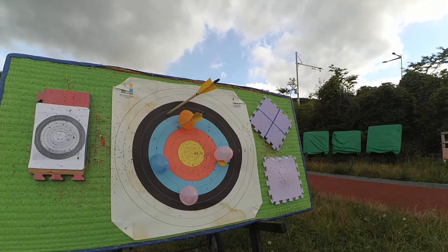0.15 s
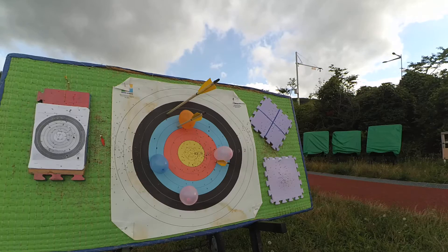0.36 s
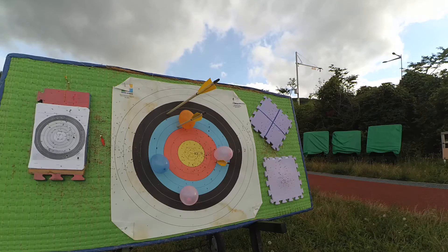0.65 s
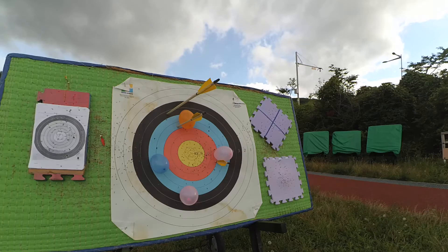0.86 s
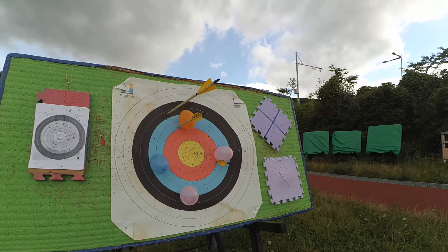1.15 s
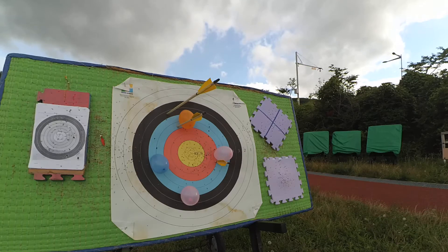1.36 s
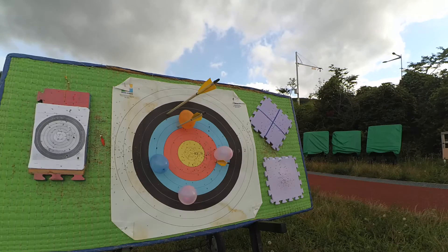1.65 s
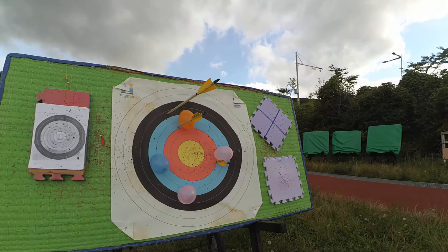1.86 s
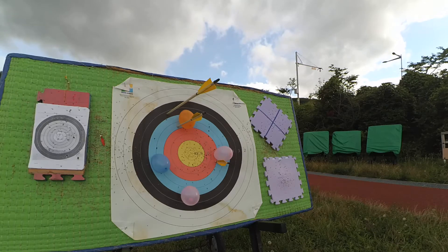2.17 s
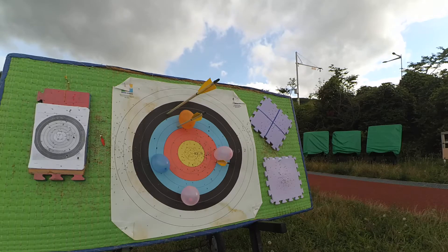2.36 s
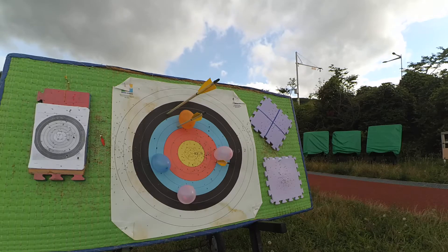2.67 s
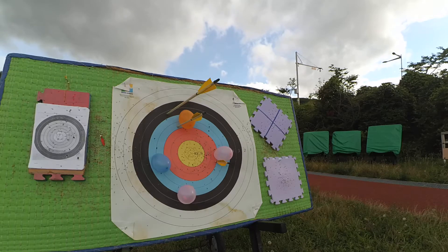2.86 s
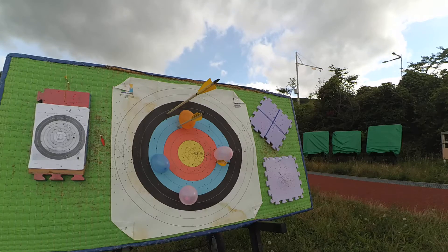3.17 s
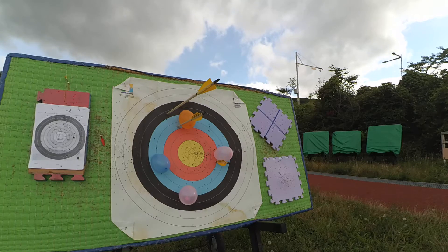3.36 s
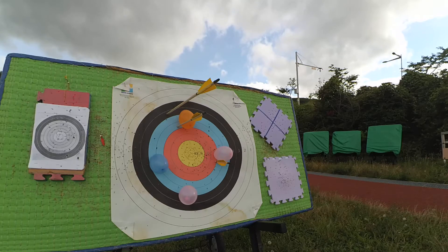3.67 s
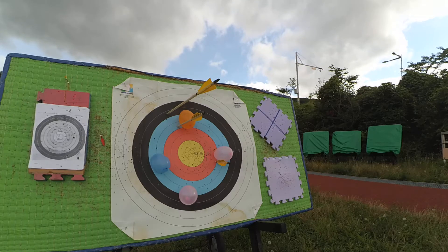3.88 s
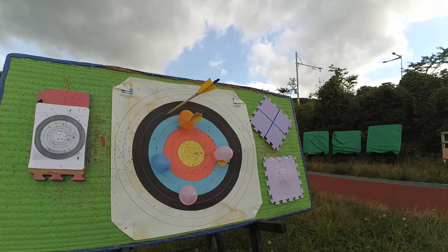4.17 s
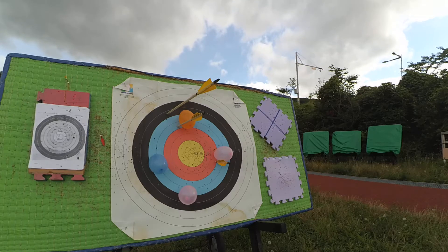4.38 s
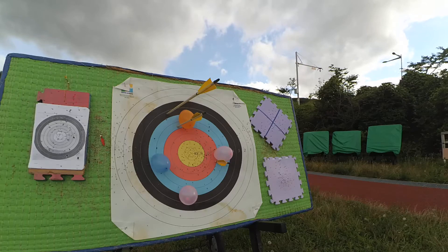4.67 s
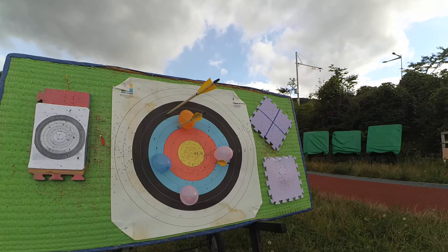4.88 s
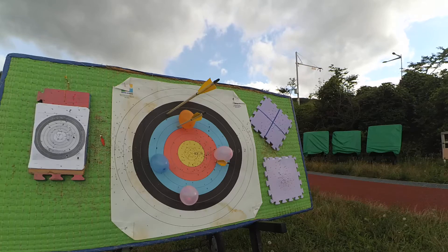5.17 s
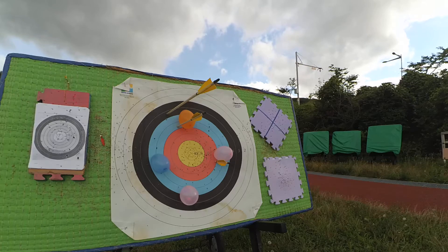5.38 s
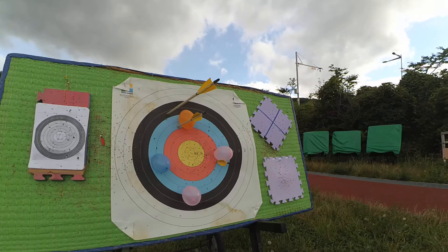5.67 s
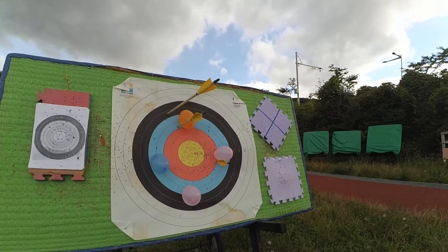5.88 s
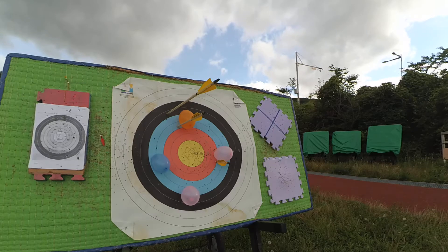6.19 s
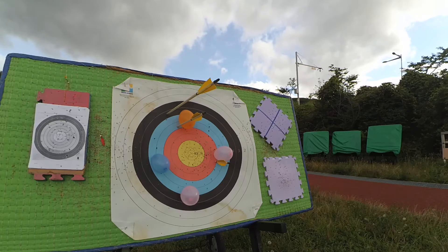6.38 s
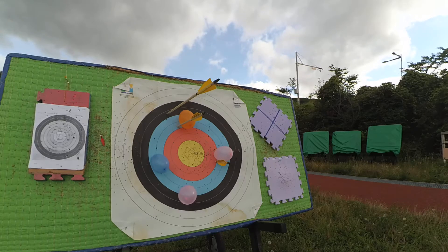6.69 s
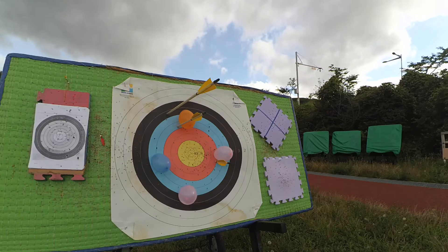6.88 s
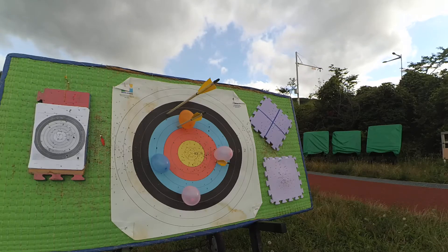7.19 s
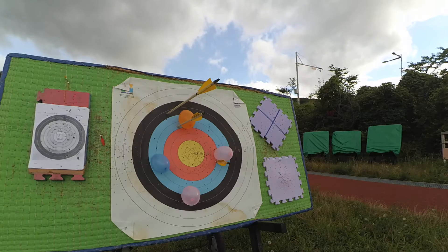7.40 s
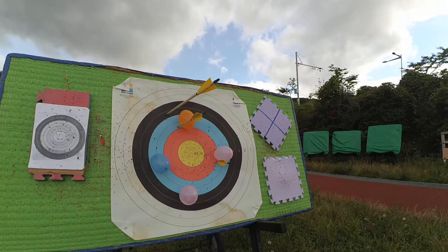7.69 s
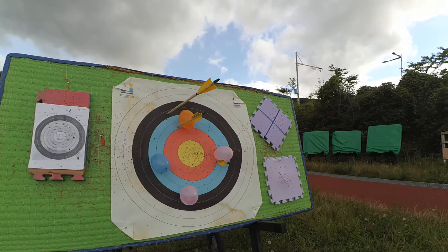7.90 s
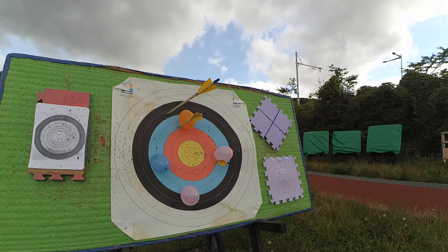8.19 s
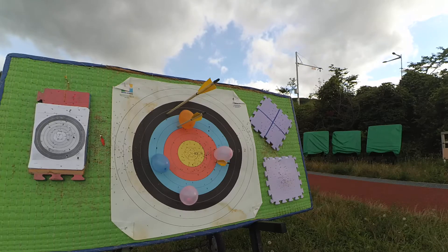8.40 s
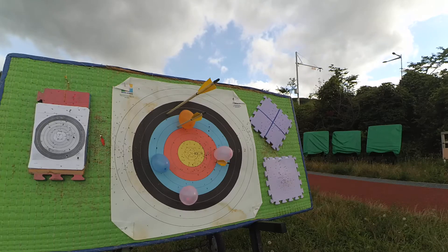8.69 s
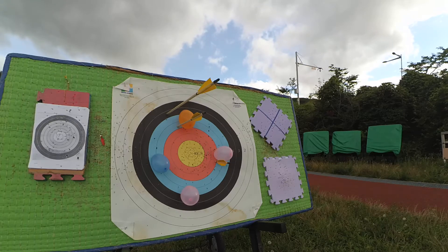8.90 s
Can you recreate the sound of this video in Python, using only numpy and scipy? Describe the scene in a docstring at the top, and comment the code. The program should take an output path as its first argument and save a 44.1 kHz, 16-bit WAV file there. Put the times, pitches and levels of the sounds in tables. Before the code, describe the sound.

Buzzy bird chirps and a few fluting notes follow a tiny cluster of clicks, heard from beside a target at a wooded archery range. Soft puffs of air nudge the microphone over a low, steady rumble. The birds soon thin to distant peeps and falling whistles, a far vehicle drifts by, and a faint cicada pulses. A short run of dull knocks comes midway, and one sharp click near the end.

```python
"""A few small sharp clicks, perhaps arrows landing some way off, then birds: a quiet archery range
at the edge of a wood, heard from beside the target. The birds chirp, flute and whistle in gliding tones
that echo off leaves and trunks, and a cicada pulses in shrill bands of noise. Light air nudges the
microphone. Behind it all a drone passes over a steady rumble, and later comes a run of soft knocks."""
import sys
import numpy as np
from scipy import signal
from scipy.fft import rfft, irfft
from scipy.io import wavfile
from scipy.ndimage import uniform_filter1d, map_coordinates

SR = 44100
rng = np.random.default_rng(int(sys.argv[2]) if len(sys.argv) > 2 else 0)


def log_audio(samples):
    """Write samples as a 16-bit WAV file to the path given in sys.argv[1]."""
    # one column per channel
    frames = np.atleast_2d(samples).T
    # limit to full scale, then quantise
    limited = np.clip(frames, -1, 1)
    pcm = np.round(limited * 32767).astype(np.int16)
    wavfile.write(sys.argv[1], SR, pcm)


N = 399105
TIME = np.arange(N) / SR


def gain_of(db):
    """Decibels to a gain."""
    return 10 ** (np.asarray(db) / 20)


def unit_rms(x):
    """Scales to an rms of 1."""
    return x / np.sqrt(np.mean(x ** 2) + 1e-20)


def add(mix, start_s, sound):
    """Lays a sound into the mix."""
    part = mix[max(round(start_s * SR), 0):][:len(sound)]
    part += sound[:len(part)]


def noise(colour, size=N):
    """Noise of rms 1, shaped by an EQ curve of (f/Hz, level/dB) points."""
    hz, db = np.transpose(colour)
    eq_db = np.interp(np.log(np.fft.rfftfreq(size, 1 / SR) + 1), np.log(hz + 1), db)
    return unit_rms(irfft(rfft(rng.standard_normal(size)) * gain_of(eq_db), size))


def wander(rate_hz, size=N):
    """Smooth random modulation of rms about 1."""
    knots = rng.standard_normal(512)
    return map_coordinates(knots, [np.arange(size) * rate_hz / SR], order=2, mode="mirror")


def hump(peak_s, half_s):
    """A bell-shaped fade in and out."""
    return np.exp(-((TIME - peak_s) / half_s) ** 2)


def fuzzy_tone(hz, width_hz):
    """A narrow band of noise that follows a pitch."""
    lowpass = signal.butter(2, width_hz / 2, fs=SR)
    blur = signal.lfilter(*lowpass, rng.standard_normal(N) + 1j * rng.standard_normal(N))
    carrier = np.exp(2j * np.pi * np.cumsum(hz * np.ones(N)) / SR)
    return unit_rms((blur * carrier).real)


# EQ of the outdoor bed: f/Hz, level/dB
AIR_EQ = [(8.8, -21.5), (15, 11), (28, -1.5), (48, -2.5), (83, -8.5), (165, -19.5), (321, -28),
          (495, -31.5), (1050, -33), (2810, -46), (5780, -46.5), (6870, -43.5), (7720, -47), (11600, -48.5),
          (15000, -49.5)]
def open_air(db=-53, waver_db=0.8):
    """A steady bed of rumble and faint hiss."""
    return gain_of(db + waver_db * wander(8.3)) * noise(AIR_EQ)


# EQ of the air at the microphone ports: f/Hz, level/dB
PORT_EQ = [(40, 9), (90, -8), (200, -37), (600, -50), (1500, -45.5), (4000, -30), (8000, -32),
           (11000, -43.5)]
def port_air(db=-80):
    """A trace of air noise that differs between the two ports."""
    return gain_of(db) * noise(PORT_EQ)


def passing(nearest_s, half_s, peak_db, bed_db):
    """Gain of a source going by in a straight line, fading with distance into a steady bed."""
    distance_squared = 1 + ((TIME - nearest_s) / half_s) ** 2
    return np.sqrt(gain_of(peak_db) ** 2 / distance_squared + gain_of(bed_db) ** 2)


# EQs of the drone's low body, its tyre-like hiss and the flare of that hiss: f/Hz, level/dB
BODY_EQ = [(60, -14), (200, 3.5), (350, -3.5), (450, 2), (507, 2.5), (580, 0.5), (900, -7.5), (1500, -27.5),
           (3000, -30.5)]
HISS_EQ = [(400, -29), (800, -4), (1300, -4), (1700, -8), (2300, -12.5), (4000, -19.5), (8000, -33)]
FLARE_EQ = [(700, -10), (1100, 0), (1400, 6.5), (1700, 0.5), (2300, -17.5), (5000, -40)]
def distant_drone(flare_s=2.54, waver_db=0.94):
    """Perhaps traffic: one pass-by, with a hum that swells and a hiss that flares as it goes past."""
    body = passing(nearest_s=2.5, half_s=0.94, peak_db=-69.5, bed_db=-77.5) * noise(BODY_EQ)
    hiss = passing(nearest_s=1.5, half_s=2, peak_db=-72.5, bed_db=-83) * noise(HISS_EQ)
    waver = gain_of(waver_db * wander(11))
    hum = gain_of(-74.5) * hump(flare_s, half_s=0.9) * fuzzy_tone(hz=504, width_hz=22)
    flare = gain_of(-69.5) * hump(flare_s, half_s=0.183) * noise(FLARE_EQ)
    return (body + hiss) * waver + hum + flare


def far_blip(db=-66.5):
    """A thin far tone, only milliseconds long."""
    return gain_of(db) * hump(peak_s=0.9, half_s=0.0043) * fuzzy_tone(hz=1330.5, width_hz=22)


# swell peaks: t/s, level/dB
SWELL_CUES = [(0.439, -70), (.82, -66.5), (1.34, -66), (1.99, -63.5), (7.09, -69), (8.27, -67.5)]
# their EQ: f/Hz, level/dB
SWELL_EQ = [(100, -23), (300, -1), (570, 4), (850, -15), (1300, -7.5), (2200, -15), (4000, -18.5),
            (9000, -23.5), (15000, -33)]
def swells(half_s=0.055):
    """Short dull swells of noise from far off."""
    return sum(gain_of(db) * hump(peak_s, half_s) for peak_s, db in SWELL_CUES) * noise(SWELL_EQ)


# far knocks at a brisk, even pace: t/s, level/dB
KNOCK_CUES = [(4.592, -65), (4.9, -66), (5.188, -64.5), (5.495, -65.5), (5.792, -66.5), (6.092, -66)]
# their EQ: f/Hz, level/dB
KNOCK_EQ = [(250, -12), (540, 4), (800, -13), (2000, -15.5), (4500, -18.5), (12000, -36)]
def knocks(attack_s=0.00775):
    """Soft hollow thumps with a faint scuff, quick to rise and a little slower to die."""
    out, age = np.zeros(N), TIME[:SR // 4] / attack_s
    envelope = age * np.exp(1 - age)
    for start, db in KNOCK_CUES:
        add(out, start, gain_of(db) * envelope * noise(KNOCK_EQ, len(age)))
    return out


# puffs of air: t/s, level/dB, half length/s
PUFF_CUES = [(0.213, -32, 0.038), (0.739, -41.5, 0.031), (1.436, -36.5, 0.04), (1.708, -41.5, 0.142),
             (3.347, -41, 0.052), (3.529, -38, 0.061), (4.392, -43, 0.058)]
def breeze(turbulence_gain=0.317, cycles_per_half=0.8):
    """Each puff pushes the microphone to and fro, longer ones more slowly, with a little turbulence."""
    out = np.zeros(N)
    turbulence = noise([(10, -16), (35, 8.0), (70, -9), (130, -22.5), (400, -44.5), (3000, -82)])
    for peak_s, db, half_s in PUFF_CUES:
        push = np.cos(2 * np.pi * (cycles_per_half * (TIME - peak_s) / half_s + rng.random()))
        out += gain_of(db) * hump(peak_s, half_s) * (push + turbulence_gain * turbulence)
    return out


def cicada(first_s=0.49, every_s=0.928, hold_s=0.52, attack_s=0.18, release_s=0.031):
    """One shrill band holds steady; a second swells and climbs through each phrase, then cuts off."""
    climb_hz, waver_hz, waver_db = 260, 45, 1.3
    ramps = sum(np.clip((TIME - start) / attack_s + .5, 0, 1) * (TIME < start + hold_s)
                for start in np.arange(first_s, N / SR, every_s))
    effort = uniform_filter1d(ramps, int(release_s * SR))
    phrase_hz = 6990 + climb_hz * (effort - 1) + waver_hz * wander(12)
    phrase = gain_of(-81.5) * effort * fuzzy_tone(phrase_hz, width_hz=380)
    held = gain_of(-84) * fuzzy_tone(6700 + waver_hz * wander(7), width_hz=570)
    return phrase * gain_of(waver_db * wander(15)) + held * gain_of(waver_db * wander(5))


# fader curve of the far birds, busy at first: t/s, level/dB
CHORUS_FADER = [(0, -84), (1.85, -79.5), (2.6, -94), (6.5, -94), (9.05, -85.5)]
def far_chorus(flicker_db=2.66):
    """Far birds blur into one flickering band."""
    fader = gain_of(np.interp(TIME, *np.transpose(CHORUS_FADER)))
    band = fuzzy_tone(hz=3950 + 100 * wander(8.6), width_hz=1100)
    return fader * band * gain_of(flicker_db * wander(13))


def wood_echo(sound, trunks_t60=1.0, leaves_t60=0.18, leaves_db=9, build_s=0.012, low_cut_hz=3200):
    """Near leaves smear a sound briefly and far trunks draw it out; short waves scatter best."""
    t = TIME[:SR]
    decay = gain_of(leaves_db - 60 * t / leaves_t60) + gain_of(-60 * t / trunks_t60)
    impulse = rng.standard_normal(SR) * decay * np.minimum(t / build_s, 1)
    echo = signal.fftconvolve(sound, impulse / np.linalg.norm(impulse))[:N]
    return signal.lfilter(*signal.butter(4, low_cut_hz, "high", fs=SR), echo)


def bird_note(glide_hz, db, buzz, fade_share, trill_hz=125, rasp_hz=1200, octave_db=-28):
    """One gliding sine; buzz shakes its pitch and level and adds a fast rasp and a faint octave."""
    size = len(glide_hz)
    t = TIME[:size]
    vibrato, jitter, tremolo, rasp = .014, .014, .26, .15
    trill = np.sin(2 * np.pi * trill_hz * t + 2 * wander(60, size))
    hz = glide_hz * (1 + buzz * (vibrato * trill + jitter * wander(900, size)))
    phase = 2 * np.pi * np.cumsum(hz) / SR
    voice = np.sin(phase) + buzz * gain_of(octave_db) * np.sin(2 * phase)
    envelope = signal.windows.tukey(size, fade_share) * (1 + tremolo * buzz * trill)
    grit = 1 + rasp * buzz * (np.sin(2 * np.pi * rasp_hz * t) + wander(2 * rasp_hz, size))
    return gain_of(db) * envelope * grit * voice


def chips(per_s=2.5, db=-79, length_s=0.017, centre_hz=3850, spread=0.2):
    """Tiny slanting notes from deep in the wood, loosely timed, each at its own pitch."""
    out, u = np.zeros(N), np.linspace(-.5, .5, int(length_s * SR))
    for slot, (lag, pitch, slant, accent) in enumerate(rng.uniform(-0.8, 1, (40, 4))):
        hz = centre_hz * (1 + spread * (pitch + slant * u))
        add(out, (slot + lag / 2) / per_s, bird_note(hz, db + 3 * accent, buzz=0.28, fade_share=.8))
    return out


# plain peeps: t/s, length/s, f/Hz, bend/share of f, level/dB, buzz (0 clean, 1 buzzy, 3 hoarse)
PEEP_CUES = [(0, 0.032, 4010, 0.05, -61, 1.2), (2.276, 0.0205, 4217, 0.011, -78, .5),
             (4.688, 0.095, 3769, 0.077, -74, 0.14), (4.773, 0.0605, 4120, 0.102, -78.5, 0.7),
             (4.835, 0.016, 4522, 0.023, -76, .3), (5.044, 0.082, 4065, 0.1, -74.5, 1.1),
             (8.014, 0.076, 3825, -0.21, -79, .2), (8.37, 0.134, 4000, .05, -78, 2.2)]
def peeps():
    """Short bird notes that bend quickly and level off."""
    out = np.zeros(N)
    for start, length, hz, bend, db, buzz in PEEP_CUES:
        u = np.linspace(0, 1, int(length * SR))
        glide_hz = hz * (1 + bend * (.25 - (1 - u) ** 2))
        add(out, start, bird_note(glide_hz, db, buzz, fade_share=0.2))
    return out


# thin arched whistles: t/s, length/s, top f/Hz, end f/Hz, top level/dB, fall level/dB
WHISTLE_CUES = [(0.302, 0.231, 4300, 2980, -86.5, -73), (3.061, 0.19, 4240, 2548, -83, -74.5),
                (4.746, 0.24, 4180, 2690, -93.5, -83), (5.612, 0.303, 4217, 3042, -77.5, -88),
                (6.326, 0.28, 4256, 2677, -82, -79), (7.037, .28, 4290, 2240, -82, -81),
                (7.916, 0.204, 4270, 3030, -83.5, -83), (8.857, 0.22, 4327, 3005, -82.5, -88.5)]
# their pitch curve: share of the length, share of the fall
WHISTLE_ARCH = [(0, .07), (.22, 0), (.46, .07), (.7, .52), (.88, .88), (1, 1)]
def whistles(fundamental_db=-6, jitter=0.011, trill_hz=140, trill_depth=0.013, flicker_db=2):
    """A farther bird trills high, then slides down; its octave leads over a blurred fundamental."""
    out = np.zeros(N)
    for start, length, top_hz, end_hz, top_db, fall_db in WHISTLE_CUES:
        size = int(length * SR)
        u = np.linspace(0, 1, size)
        fall = np.interp(u, *np.transpose(WHISTLE_ARCH))
        hz = top_hz + (end_hz - top_hz) * fall
        trill = trill_depth * (1 - fall) * np.sin(2 * np.pi * trill_hz * length * u)
        phase = 2 * np.pi * np.cumsum(hz * (1 + trill + jitter * wander(600, size))) / SR
        voice = np.sin(2 * phase) + gain_of(fundamental_db) * np.sin(phase + 2 * wander(450, size))
        db = np.interp(u, [.38, .6], [top_db, fall_db]) + flicker_db * wander(77, size)
        add(out, start, gain_of(db) * signal.windows.tukey(size, .15) * voice)
    return out


# one bird's rising sweep and lower arched call, and a farther bird's falling slur
# their shapes: t/s into the call, f/Hz, level/dB
SWEEP_SHAPE = [(0, 3150, -12.5), (.02, 4200, 1), (.06, 4890, -1.5), (.102, 5500, -6.5), (.119, 3700, -14),
               (.122, 5100, -7), (.135, 3650, -8), (.149, 4500, -13)]
ARCH_SHAPE = [(0, 3250, -8.5), (.035, 3722, -2.5), (.06, 4160, 1.5), (.08, 4094, -1.5), (.1, 3350, -2),
              (.122, 2320, -12.5)]
SLUR_SHAPE = [(0, 4040, 1.5), (.022, 3810, -1.5), (.04, 3100, 2.5), (.06, 2578, -1)]
# their cues: t/s, level/dB
SWEEP_CUES = [(0.244, -58), (.838, -60), (1.439, -62.5), (8.658, -79), (8.955, -77)]
ARCH_CUES = [(.54, -61.5), (1.133, -62)]
SLUR_CUES = [(8.089, -76), (8.411, -76)]
def chirps(near_db=-60, echo_falloff=0.76):
    """Buzzy calls, as direct sound and echo send; with distance the echo fades less than the call."""
    direct, send = np.zeros((2, N))
    for shape, cues, buzz in [(SWEEP_SHAPE, SWEEP_CUES, 1.0), (ARCH_SHAPE, ARCH_CUES, 2.2),
                              (SLUR_SHAPE, SLUR_CUES, 0.63)]:
        times, hz, contour_db = np.transpose(shape)
        t = np.arange(0, times[-1], 1 / SR)
        for start, db in cues:
            call = bird_note(np.interp(t, times, hz), np.interp(t, times, contour_db), buzz, 0.059)
            add(direct, start, gain_of(db) * call)
            add(send, start, gain_of(near_db + echo_falloff * (db - near_db)) * call)
    return direct, send


# notes of a lower, fluting song: t/s, length/s, five f/Hz evenly spaced along the note, level/dB
SONG_NOTES = [(1.414, 0.051, 2050, 1686, 1885, 1906, 1583, -48),
              (1.566, 0.07, 1533, 1775, 2050, 2468, 3400, -48),
              (1.71, 0.0168, 4100, 3300, 3005, 2780, 2746, -49.5),
              (1.738, 0.06, 2230, 2337, 2150, 1800, 1668, -48),
              (1.771, 0.078, 3942, 3980, 3800, 3500, 3230, -44.5)]
def song(throat_hz=2396, db_per_octave=-24.5, swell_power=0.174):
    """Fluting notes swell and fade as they bend, loudest near the throat's resonance."""
    out = np.zeros(N)
    for start, length, *pitches, db in SONG_NOTES:
        u = np.linspace(0, 1, int(length * SR))
        bend = np.polyfit(np.linspace(0, 1, len(pitches)), pitches, len(pitches) - 1)
        hz = np.polyval(bend, u)
        throat_db = db_per_octave * abs(np.log2(hz / throat_hz))
        swell = abs(np.sin(np.pi * u)) ** swell_power
        add(out, start, swell * bird_note(hz, db + throat_db, buzz=.4, fade_share=0))
    return out


# hard contacts: t/s, level/dB, t60/s, low cut f/Hz
CLICK_CUES = [(0.0242, -51.5, 0.0122, 2500), (0.033, -52, .011, 2000), (0.0363, -45.5, 0.02, 3020),
              (0.0466, -48.5, 0.053, 1700), (1.137, -58, 0.017, 3444), (1.157, -57.5, 0.15, 3220),
              (2.923, -65, 0.024, 2500), (7.9387, -51, .003, 3400), (7.94, -49, 0.022, 3780),
              (7.9476, -57.5, .004, 3800)]
# the ring they share: f/Hz, level/dB, t60/multiple of the click's
RING_MODES = [(2914, -13.5, 2.5), (4083, -6, 1.1), (4880, -22, 1), (6400, -11, 1.3)]
def clicks(crackle_gain=0.98, snap_gain=0.25, snap_s=0.00017, bend=0.34, bend_s=0.0013):
    """Small hard contacts: an instant snap, a dying crackle and a ring that starts sharp and settles."""
    out, t = np.zeros(N), TIME[:4096]
    eq = [(500, 7.5), (2100, -1.5), (2900, 1.5), (4500, 2.5), (6800, -4.5), (9000, -12.5), (15000, -24.5)]
    bent_time = np.cumsum(1 + bend * np.exp(-t / bend_s)) / SR
    for start, db, t60, low_cut_hz in CLICK_CUES:
        decay = gain_of(-60 * t / t60)
        crack = noise(eq, len(t)) * (crackle_gain + snap_gain * np.exp(-t / snap_s)) * decay
        ring = sum(gain_of(mode_db) * np.sin(2 * np.pi * hz * bent_time) * decay ** (1 / longer)
                   for hz, mode_db, longer in RING_MODES)
        low_cut = signal.butter(3, low_cut_hz, "high", fs=SR)  # smaller contacts radiate less body
        add(out, start, gain_of(db) * signal.lfilter(*low_cut, crack + ring))
    return out


def scene(chirp_echo_db=-2, song_echo_db=-7.5, click_echo_db=-13, side_db=-28):
    """Nearly mono; only echoes from the trees and a trace of air noise differ between the ears."""
    callers, chirp_send = chirps()
    singer = song()
    far_birds = whistles() + peeps() + chips()
    contacts = clicks()
    send = gain_of(chirp_echo_db) * chirp_send + far_birds + gain_of(click_echo_db) * contacts
    echoes = wood_echo(send) + gain_of(song_echo_db) * wood_echo(singer, trunks_t60=1.15, low_cut_hz=2500)
    treetops = far_chorus() + cicada()
    background = breeze() + open_air() + distant_drone() + far_blip() + swells() + knocks()
    mid = background + treetops + echoes + far_birds + callers + singer + contacts
    side = gain_of(side_db) * wood_echo(send + treetops) + port_air()
    return np.array([mid + side, mid - side])


def record(dry, high_cut_hz=15250):
    """A steep high cut on the whole mix."""
    lowpass = signal.firwin(511, high_cut_hz, window=("kaiser", 9), fs=SR)
    return signal.oaconvolve(dry, lowpass[None], "same")


dry = scene()
out = record(dry)
log_audio(out)
```